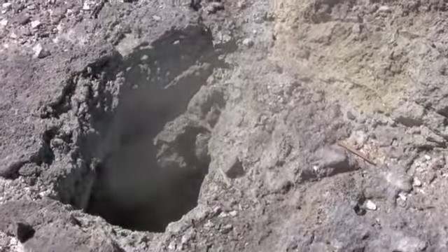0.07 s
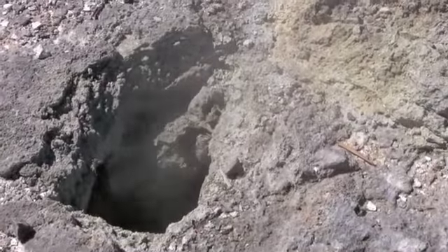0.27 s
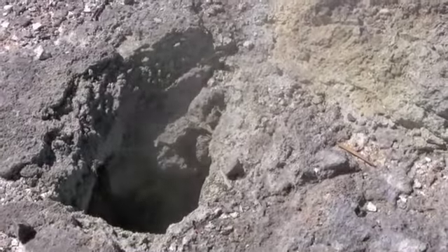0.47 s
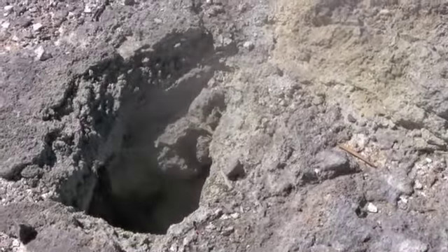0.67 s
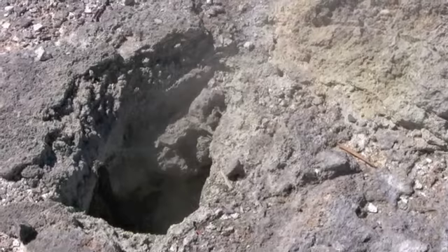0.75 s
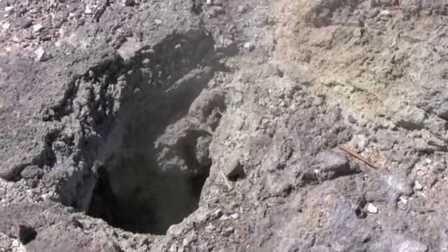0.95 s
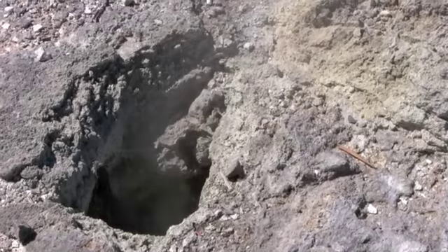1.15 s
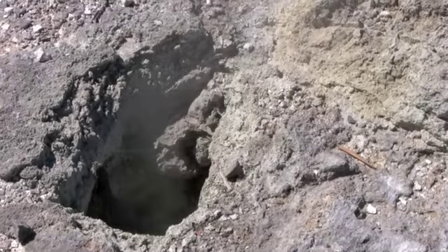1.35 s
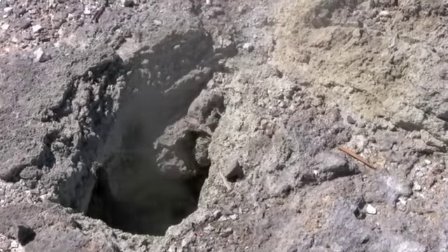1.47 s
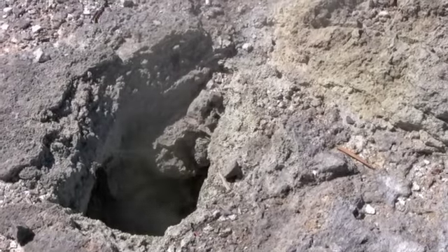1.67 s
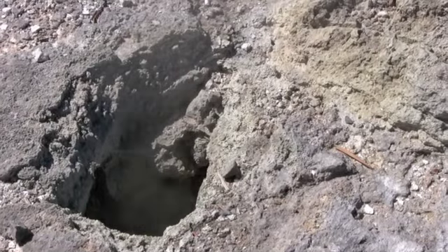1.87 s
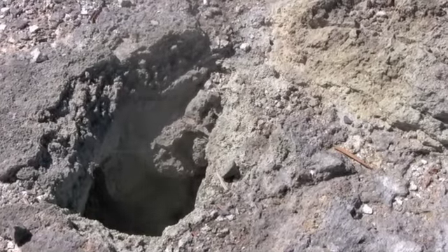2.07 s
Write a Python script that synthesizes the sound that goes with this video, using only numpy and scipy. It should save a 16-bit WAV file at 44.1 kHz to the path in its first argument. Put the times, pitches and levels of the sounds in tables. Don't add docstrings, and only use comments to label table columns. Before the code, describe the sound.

Thick mud plops and pops in bursts deep in a hollow rock hole, with faint hiss

```python
import sys
import numpy as np
from scipy import signal
from scipy.io import wavfile
from scipy.ndimage import uniform_filter1d

SR = 44100
rng = np.random.default_rng(int(sys.argv[2]) if len(sys.argv) > 2 else 0)


def persist_wave(psi):
    counts = np.round(np.clip(psi, -1, 1) * 32767).astype(np.int16)
    wavfile.write(sys.argv[1], SR, np.atleast_2d(counts).T)


def volts(x):
    e = np.asarray(x, float) / 20
    return 10 ** e


N = 92610

# [Hz, dB]
HISS_COLOUR = [(300, -9), (2500, 3), (4500, -1), (5200, -1.5), (9500, -3), (12500, -3.5), (13800, -17),
               (15500, -19)]
# [Hz, rad]
PORT_LEAD = [(2600, 0), (7500, -1.5), (11000, -3), (14000, -2)]
# [Hz, dB]
MOTOR_LINES = [(4484, -80.5), (4680, -92), (5243, -89), (6002, -81.5), (6298, -80), (7187, -90),
               (9362, -75), (9510, -76.5), (9615, -80), (10530, -92), (11780, -79.5)]
# [s, s, dB]
FOCUS_RUNS = [
    (.66, .74, -2),
    (1.81, 1.998, 0),
]
# [Hz, dB]
FOCUS_TONES = [(4199, -79), (4500, -74), (4802, -74), (5399, -79), (5701, -75), (6002, -72), (6137, -75),
               (6298, -77), (6600, -84), (6901, -81)]
# [Hz, dB, dB, s]
SHELL_MODES = [(1154, 9.5, 3.5, 0.016), (2150, -14, -14, 0.034), (2400, -24, -8, 0.075),
               (3070, -25, -12, 0.022), (4000, -7.5, -23, 0.0072), (4290, -33, -7.5, 0.0074),
               (7000, -25, -14.5, 0.0058), (13100, -28, -19, 0.0035), (1440, -11, -14, 0.0044),
               (10250, -22, -14, 0.0055)]
# [s, dB]
SIMMER_LEVEL = [(0.0, -42.5), (0.25, -41), (2.1, -40.5)]
# [Hz, dB]
MUD_COLOUR = [(28, -42), (45, -4), (100, -8.5), (182, -6.5), (379, -3), (1200, -16), (2000, -27.5),
              (4000, -46.5)]
# [Hz, Hz, dB]
SHAFT_MODES = [(185, 64, 9.5), (590, 48, -2.5), (850, 400, 1.5)]
# [Hz, 1]
SIMMER_LIKENESS = [(40, 0.55), (300, 0.84), (3000, 0.67)]
# [s, s, dB, dB/octave]
SPATTER = [
    (0.272, .036, -39.5, -8),
    (0.905, .025, -54, -14),
    (1.547, 0.042, -53, -4),
    (1.762, 0.055, -53.5, -6),
]
# [s, dB, Hz]
SPRAY_PUFFS = [
    (0.512, -49, 6500),
    (.788, -57, 7900),
    (1.1734, -53.5, 7000),
    (1.3098, -54, 6100),
    (1.416, -54, 6400),
    (1.561, -50, 5640),
    (1.7652, -52, 7000),
    (1.7748, -53, 6800),
    (2.0028, -52, 6000),
]
# [s, dB, Hz]
DROPLETS = [(.4249, -49, 2490), (0.5107, -35.5, 2150), (.5726, -46.5, 2350), (0.678, -45.5, 2110),
            (0.8975, -27.5, 2140), (.9952, -59, 2300), (1.0021, -46.5, 2400), (1.0805, -50, 2400),
            (1.085, -51.5, 3300), (1.537, -48, 1770), (1.56, -43, 1730), (1.2737, -41, 2400),
            (1.3056, -48, 2230), (1.3467, -43.5, 2540), (1.5234, -47, 2070), (1.7179, -52, 2330),
            (1.7335, -49, 2480), (1.7335, -47, 3630), (1.7412, -41.5, 2420), (1.765, -47, 2700),
            (1.791, -48, 2300), (1.798, -51, 3640), (1.816, -48, 3350), (1.818, -46, 2600),
            (1.846, -50.5, 3900)]
# [s, dB, Hz, s]
DOMES = [
    (0.238, -19.5, 648.0, 0.037),
    (0.2703, -27, 604, 0.062),
    (0.2719, -6.5, 608, 0.041),
    (0.8871, -25.5, 564, 0.066),
    (1.5488, -9, 600, 0.018),
    (1.5604, -14, 520, 0.016),
    (1.7737, -17, 620, 0.016),
    (1.8221, -25, 650, 0.03),
]
# [s, dB,
# Hz, cycles]
MORE_BUBBLES = [(.324, -30.5, 490, 1), (.635, -33.5, 600, 1.7), (.653, -28.5, 247, 1),
                (0.686, -32, 237, 1.5), (.795, -34.5, 395, 2.3), (0.843, -33.5, 970, 1.3),
                (.872, -34.5, 475, 2.6), (0.901, -33, 1200, 4.4), (0.9013, -51, 3040, 6.6),
                (0.91, -35.5, 1000, 2.7), (1.122, -37, 109, 1.3), (1.149, -42.5, 2064, 12),
                (1.155, -31, 416, 1.6), (1.1617, -37, 640, 3.2), (1.1705, -37, 590, 2.5),
                (1.2555, -46, 690, 1.6), (1.502, -33.5, 111, 1.6), (1.5254, -30.5, 580, 1.2),
                (1.539, -35, 580, 3.2), (.998, -58.5, 3600, 16), (1.159, -55.5, 3570, 9),
                (1.7352, -52, 11000, 14), (1.742, -45.5, 3500, 6.9), (1.763, -32.5, 1140, 2.4),
                (1.77, -29, 920, 2), (1.799, -33.5, 820, 4.2), (1.815, -31, 850, 3.6),
                (1.945, -34.5, 645, 1.4), (2.001, -35.5, 794, 0.86)]
# [s, dB, Hz, cycles]
THROAT_POPS = [(0.2173, -22, 483, 1.4), (0.2251, -28, 810, 2.3), (0.2536, -30.5, 409.0, 4.1),
               (0.2595, -27.5, 510, 4.5), (0.271, -33, 358.0, 3.5), (0.2727, -25, 670, 6.1),
               (0.2764, -19.5, 850, 4.9), (0.2813, -24.5, 467, 4.3), (0.2847, -22, 840, 4),
               (0.2925, -24, 445, 1.1), (0.451, -28, 516, 1.66), (0.6794, -25.5, 543, 0.71),
               (1.567, -20, 517, 1.36), (1.7205, -29.5, 493, 2.1), (1.7466, -26.3, 388, 1.3),
               (1.7481, -29, 568.0, 3.8), (1.76, -28, 383.0, 1.3), (1.7655, -23.5, 606.0, 2.7),
               (1.771, -26, 436.0, 3.2), (1.7758, -27, 380, 4.3), (1.7805, -33, 383.0, 6.1),
               (1.7868, -17, 480, 0.69), (1.789, -26, 466.0, 0.51), (1.7964, -16.5, 498.0, 2.13),
               (1.8014, -25, 656, 3), (1.8021, -29.5, 341, 3.2), (1.8089, -25.5, 503, 2.7),
               (1.8111, -18.5, 604, 4.84), (1.8136, -17.5, 498.0, 3.2), (1.8402, -31, 536, 3.2)]
# [s, dB, Hz, cycles]
BIG_PLOPS = [(0.2006, -25, 194, 2.6), (0.218, -29, 277, 1.3), (0.2245, -22, 181, 1.45),
             (0.2421, -25.5, 224, 1.0), (0.25, -31.5, 198.0, 1.5), (0.2531, -20.5, 187, 2.9),
             (0.254, -28, 314.0, 2.1), (0.265, -26, 133, 0.73), (0.2704, -25.5, 256, 3.1),
             (0.278, -29, 198.0, 2.3), (0.2956, -25.8, 184, 0.89), (0.3303, -34, 163.0, 2),
             (0.854, -26, 187, 2.3), (0.8663, -27, 200, 0.81), (0.901, -26.2, 188, 1.44),
             (0.994, -36.6, 174.0, 2.7), (1.1213, -30.5, 185, 1.2), (1.1291, -21, 186.2, 2.5),
             (1.1494, -30, 308, 1.7), (1.1556, -37, 174.0, 2.2), (1.5133, -29.5, 184, 1.1),
             (1.5558, -30, 226.0, 3.2), (1.6922, -31.5, 142, 1.7), (1.7007, -31.5, 310, 1.9),
             (1.704, -24.5, 196, 1.5), (1.7462, -15.5, 173, 0.9), (1.752, -30.5, 125.0, 2.6),
             (1.756, -34, 90.0, 1.3), (1.7625, -17.5, 196, 1.06), (1.7742, -21.4, 241.0, 1.0),
             (1.7854, -23.5, 198.0, 3.1), (1.788, -30.5, 163.0, 1.1), (1.7995, -30.5, 226.0, 5.7),
             (1.8179, -29.5, 141, 0.98), (1.8408, -30.5, 172, 1.05), (2.072, -27, 212.0, 0.76)]

BUBBLE_HALF_SPAN_S = 0.05


def evened(x):
    return x / np.sqrt(np.mean(x ** 2) + 1e-20)


def read(points, hz):
    f, value = np.transpose(points)
    return np.interp(np.log(hz + 1), np.log(f + 1), value)


def add(mix, start_s, sound):
    part = mix[..., round(start_s * SR):][..., :sound.shape[-1]]
    part += sound[..., :part.shape[-1]]


def ring(hz, t60_s):
    t = np.arange(4000) / SR
    onset = (1 - np.exp(-t * hz * 3.43)) ** 2
    decay = volts(-60 * t / max(t60_s, .002))
    return onset * decay * np.sin(2 * np.pi * hz * t)


def bubble(hz, cycles):
    rise_share, glide, overtone_db = 0.83, 0.1, -32
    t = np.arange(-BUBBLE_HALF_SPAN_S, BUBBLE_HALF_SPAN_S, 1 / SR)
    u = t * hz / max(cycles, .5)
    swell = np.exp(-1.4 * np.where(u < 0, u / rise_share, u * rise_share) ** 2)
    phase = 2 * np.pi * hz * t * (1 + glide * u / max(cycles, 2))
    return swell * (np.cos(phase) + volts(overtone_db) * np.cos(2 * phase))


def noise(gain, same, lead_rad, patch_db):
    a, b, c, d, patch = rng.standard_normal((N // 256 + 5, 513, 5)).T
    patch = evened(uniform_filter1d(uniform_filter1d(patch, 8, 0), 6, 1))
    same = np.clip(same, 0, 1)[:, None]
    shared, own = a + 1j * b, c + 1j * d
    left = shared * np.exp(1j * lead_rad)[:, None]
    right = same * shared + np.sqrt(1 - same ** 2) * own
    z = np.array([left, right]) * gain[:, None] * volts(patch_db * patch)
    return evened(signal.istft(z, nperseg=1024, noverlap=768)[1][:, :N])


def hiss():
    level_db, flicker_db, likeness = -61, 1.65, 0.34
    hz = np.fft.rfftfreq(1024, 1 / SR)
    flicker = evened(uniform_filter1d(rng.standard_normal(N), 700))
    bed = noise(volts(read(HISS_COLOUR, hz)), likeness + 0 * hz, read(PORT_LEAD, hz), patch_db=1.0)
    return volts(level_db + flicker_db * flicker) * bed


def motor_whine():
    drum_hz, drum_db, drum_spread_db = 150.02, -89, 5
    waver_db, wobble_hz = 3, 28.3
    t, out = np.arange(N) / SR, np.zeros((2, N))
    comb = [(k * drum_hz, drum_db + drum_spread_db * rng.uniform(-1.5, 1)) for k in range(24, 84)]
    for f, db in MOTOR_LINES + comb:
        start, rate, at = rng.random(3)
        waver = np.sin(2 * np.pi * ((1 + 4 * rate) * t + at))
        wobble = f / 10000 * np.sin(2 * np.pi * (wobble_hz * t + at))
        lead = np.array([[read(PORT_LEAD, f)], [0]])
        out += volts(db + 6.0 + waver_db * waver) * np.sin(2 * np.pi * (f * t + start) + wobble + lead)
    return out


def focus_motor():
    ramp_s = 0.01
    t, out = np.arange(N) / SR, np.zeros((2, N))
    on = sum(volts(db) * np.clip(np.minimum(t - a, b - t) / ramp_s, 0, 1) for a, b, db in FOCUS_RUNS)
    for f, db in FOCUS_TONES:
        lead = np.array([[read(PORT_LEAD, f) / 2], [0]])
        out += on * volts(db + 3.5) * np.sin(2 * np.pi * (f * t + rng.random()) + lead)
    return out


def shell_knock():
    modes = sum(volts(np.array([[l], [r]])) * ring(f, t60) for f, l, r, t60 in SHELL_MODES)
    return volts(-18.5) * modes


def camcorder():
    pan_db = -2
    out = hiss() + motor_whine() + focus_motor()
    out *= volts(np.array([[pan_db / 2], [-pan_db / 2]]))
    add(out, 0.2211, shell_knock())
    return out


def simmer_colour(hz):
    shaft_db = sum(db / (1 + (2 * (hz - f) / w) ** 2) for f, w, db in SHAFT_MODES)
    return volts(read(MUD_COLOUR, hz) + shaft_db)


def simmer():
    bubbles_per_s, spread_db, cycles = 900, 3, 2.85
    bubbles_db, wash_db = -8, -1.5
    hz, crowd = np.fft.rfftfreq(1024, 1 / SR), np.zeros((2, N))
    size = volts(spread_db * np.minimum(rng.exponential(1, N), 4))
    size = size * (rng.random(N) < bubbles_per_s / SR)
    kind, side = rng.integers(0, 30, N), rng.uniform(-0.24, 1, N)
    for k, f in enumerate(np.geomspace(110, 2600, 30)):
        train = size * (kind == k) * (1 + .5 * np.array([side, -side]))
        voice = f * simmer_colour(f) * bubble(f, cycles)
        crowd += signal.oaconvolve(train, voice[None], "same", axes=1)
    wash = noise(simmer_colour(hz), read(SIMMER_LIKENESS, hz), 0 * hz, patch_db=2.5)
    level = volts(np.interp(np.arange(N) / SR, *np.transpose(SIMMER_LEVEL)))
    return level * (volts(bubbles_db) * evened(crowd) + volts(wash_db) * wash)


def spatter():
    drops_per_s, spread_db, lateness, cycles = 5200, 1.7, 1.3, 5
    mix = np.zeros(N)
    for s, length, db, tilt_db in SPATTER:
        when, pitch, size = rng.random((300, 3))[:round(drops_per_s * length)].T
        for u, hz, e in zip(when, 1100 + 9000 * pitch ** 1.6, -np.log(size + 0.032)):
            swell = np.sin(np.pi * u ** lateness)
            gain = volts(db + tilt_db * np.log2(hz / 1000) + spread_db * e)
            drop = bubble(hz, cycles)[1764:2646]
            add(mix, s + u * length - .01, swell * gain * drop)
    return mix


def spray():
    decay_s, width_hz, level_db = 0.0026, 3100, -1
    mix, t = np.zeros(N), np.arange(2000) / SR
    for s, db, hz in SPRAY_PUFFS:
        band = signal.butter(2, [hz - width_hz / 2, hz + width_hz / 2], "band", fs=SR)
        puff = evened(signal.lfilter(*band, rng.standard_normal(2000)))
        add(mix, s, volts(db + level_db) * puff * np.exp(-t / decay_s))
    return mix


def droplet_ticks():
    cycles, low_ratio, low_db = 3, 0.84, -10.5
    body_hz, body_db, body_t60_s = 830, 6.5, 0.014
    mix = np.zeros(N)
    for s, db, hz in DROPLETS:
        drop = bubble(hz, cycles) + volts(low_db) * bubble(hz * low_ratio, cycles)
        drop = drop[2110:]
        body = volts(body_db) * ring(body_hz, body_t60_s)[:len(drop)]
        add(mix, s - .0007, volts(db) * (drop + body))
    return mix


def dome_slaps():
    mix = np.zeros(N)
    for s, db, hz, t60 in DOMES:
        add(mix, s, -volts(db) * ring(hz, t60))
    return mix


def bursting_bubbles():
    mix = np.zeros(N)
    for s, db, hz, cycles in BIG_PLOPS + THROAT_POPS + MORE_BUBBLES:
        add(mix, s - BUBBLE_HALF_SPAN_S, volts(db) * bubble(hz, cycles))
    return mix


def rock_echo(mix):
    level_db, t60_s, wide_db = -12.5, 0.074, -21.5
    walls = rng.standard_normal((3, 4000)) * volts(-60 * np.arange(4000) / SR / t60_s)
    walls = walls[0] + volts(wide_db) * walls[1:]
    walls = walls / np.linalg.norm(walls[0])
    return mix + volts(level_db) * signal.fftconvolve(mix[None], walls, axes=1)[:, :N]


def scene():
    bursts = spatter() + spray() + droplet_ticks() + dome_slaps() + bursting_bubbles()
    return rock_echo(bursts) + simmer() + camcorder()


def low_pass(x):
    return signal.sosfilt(signal.butter(12, 16480, fs=SR, output="sos"), x)


def record(dry):
    low_cut_hz, edge_hz = 44, 15700
    mix = signal.lfilter(*signal.butter(2, low_cut_hz, "high", fs=SR), dry)
    edge = signal.firwin(511, edge_hz, window=("kaiser", 9), fs=SR)
    mix = signal.oaconvolve(mix, edge[None], "same", axes=1)
    return low_pass(mix)


dry = scene()
out = record(dry)
persist_wave(out)
```